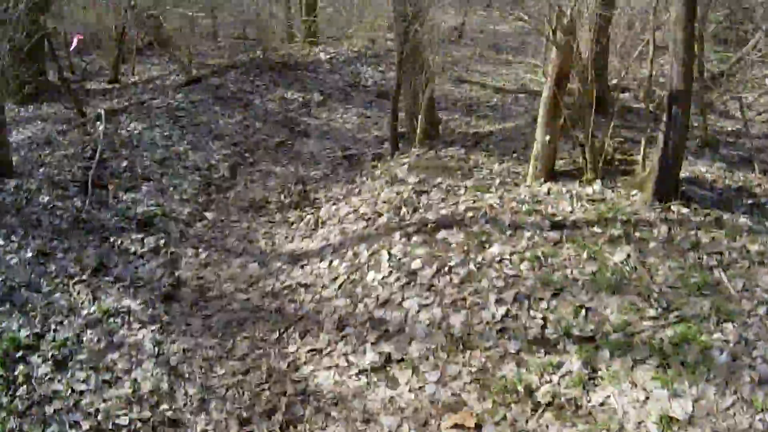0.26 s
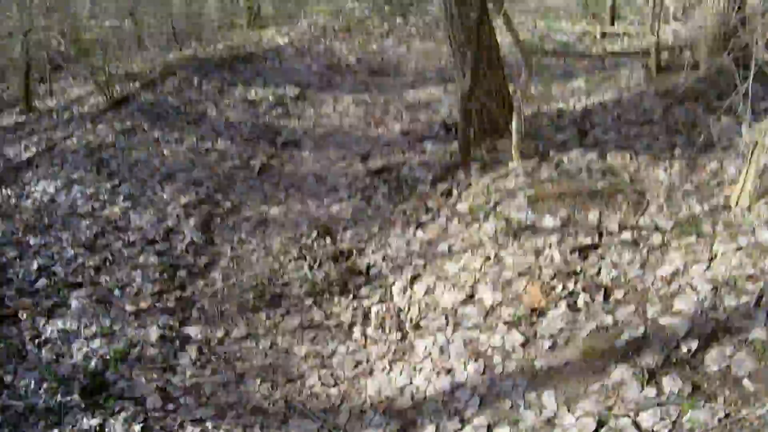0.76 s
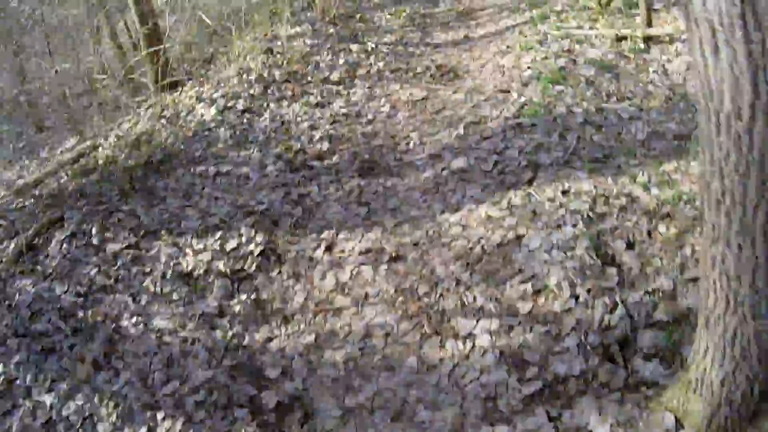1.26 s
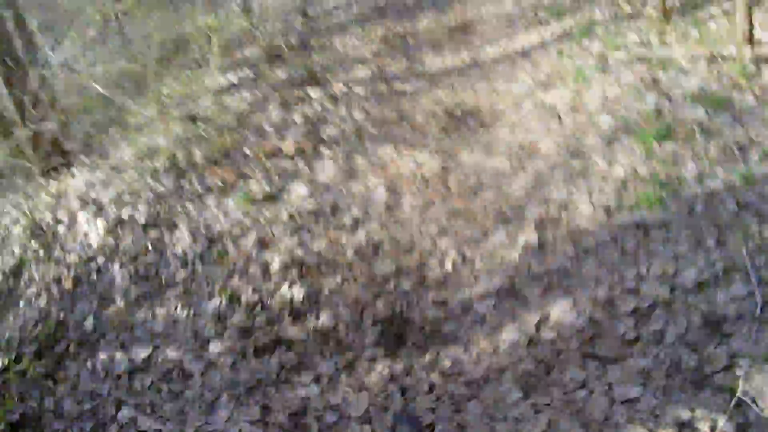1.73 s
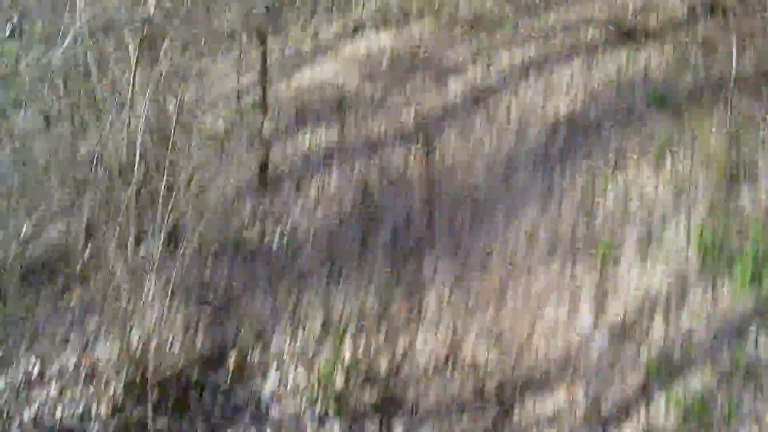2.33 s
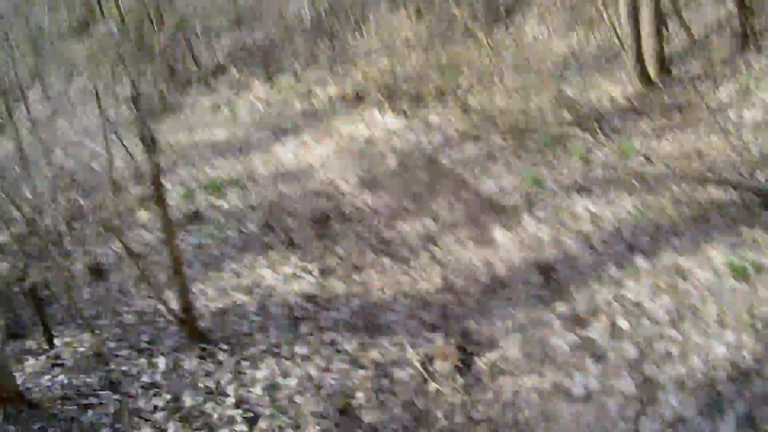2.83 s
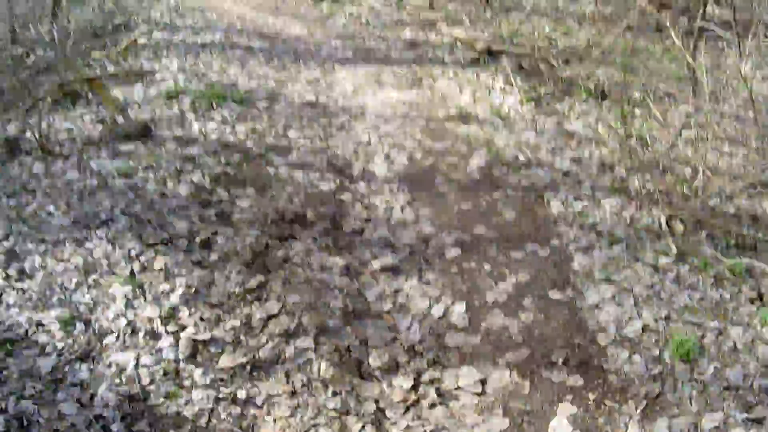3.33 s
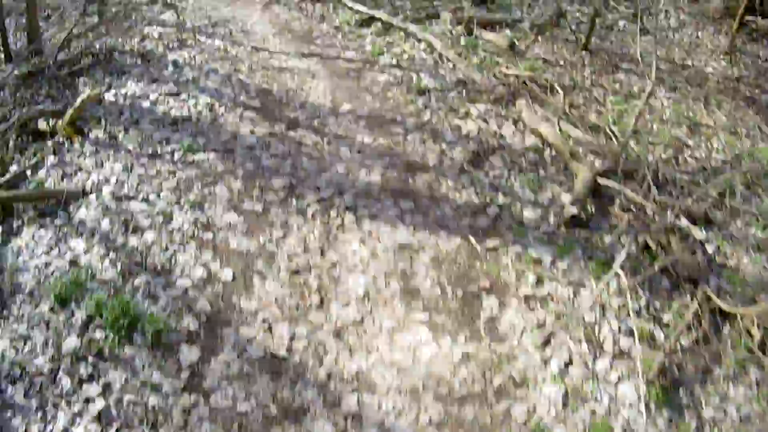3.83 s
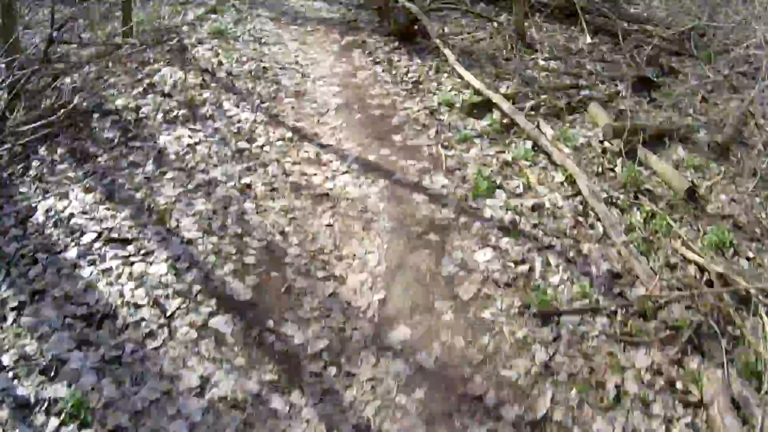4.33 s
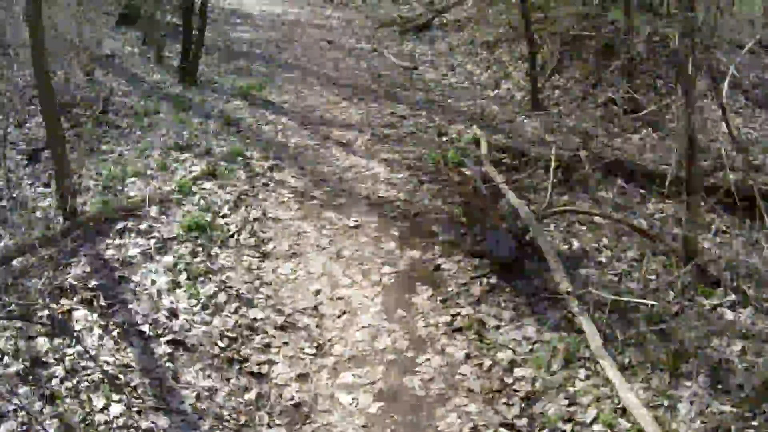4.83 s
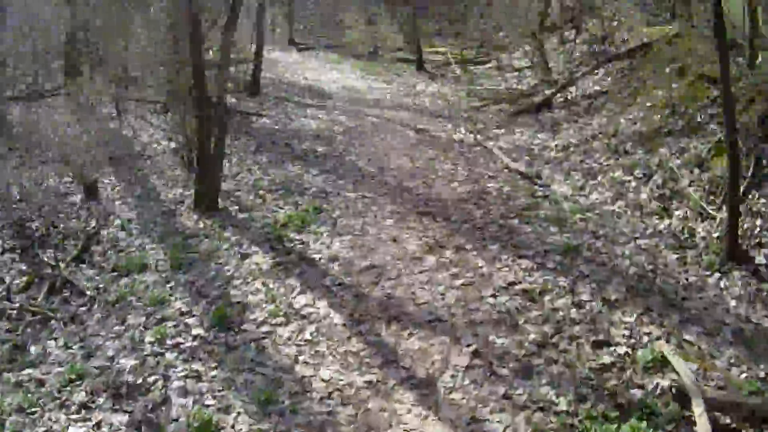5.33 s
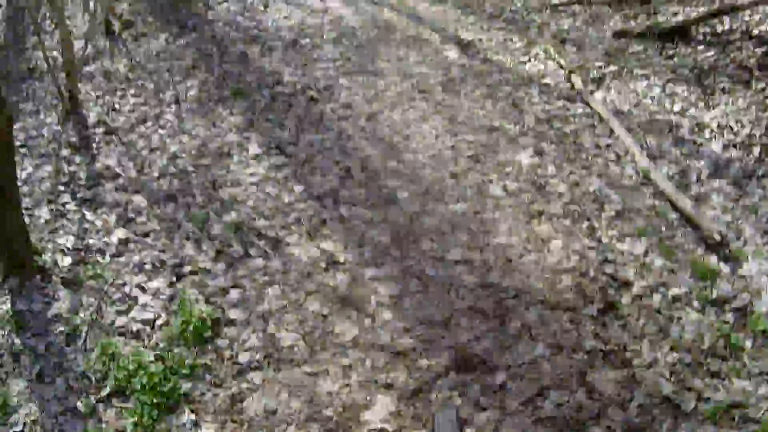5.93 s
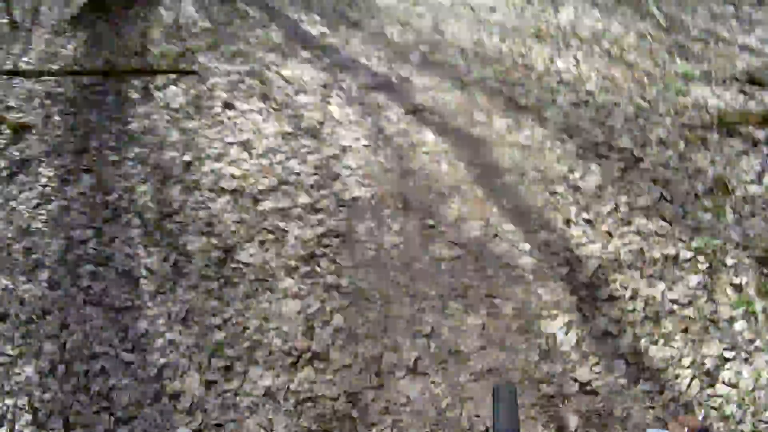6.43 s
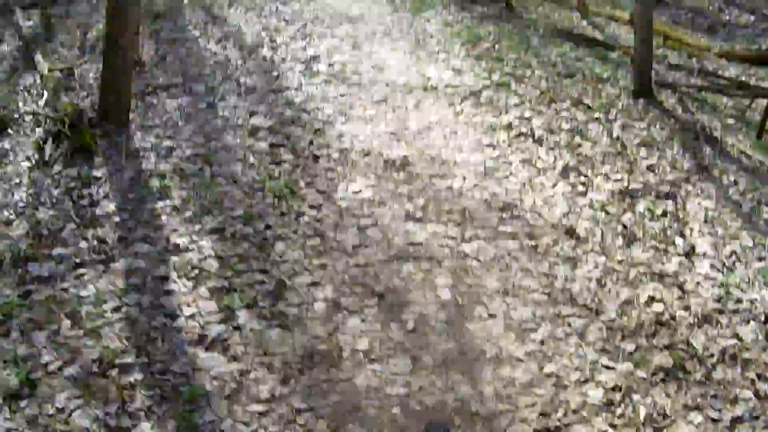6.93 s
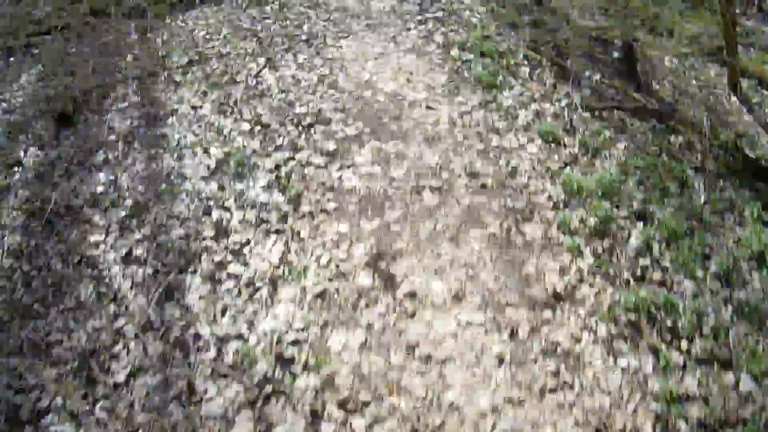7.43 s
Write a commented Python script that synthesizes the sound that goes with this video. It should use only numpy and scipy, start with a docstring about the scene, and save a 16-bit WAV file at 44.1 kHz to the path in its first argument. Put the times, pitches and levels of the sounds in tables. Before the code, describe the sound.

Close, mono, wind-battered sound of a bike on soil and dry leaves outdoors. Knobby tyres roar in uneven pulses, leaves crackle, and roots give short dull thuds. Chain and frame knock in dry metallic clusters, early, near the middle and hardest late, with tiny steel jingles. Brief high brake squeaks come at the start and after the first big jolt. Faint hiss lies beneath.

```python
"""A mountain bike runs down a leafy trail, heard from a small camera on the rider.
Chain and frame knock and chatter: short noise scrapes ring a bank of modes. Tyres roar, thud and crunch
over dry leaves: shaped noise and tiny snaps. A brake disc squeaks thin and high, small steel parts jingle:
narrow noise bands. Air rumbles and buffets the microphone at each bob of the ride, overloading it: noise
shaped by eddy size. A faint, steady hiss lies under everything."""
import sys
import numpy as np
from scipy import signal
from scipy.fft import rfft, irfft, next_fast_len
from scipy.io import wavfile
from scipy.ndimage import uniform_filter1d

SR = 44100
rng = np.random.default_rng(int(sys.argv[2]) if len(sys.argv) > 2 else 0)


def file_out(sig):
    """Save sig as 16-bit WAV at sys.argv[1]."""
    # one column per channel
    cols = np.atleast_2d(sig).T
    # limit, then scale
    lim = np.clip(cols, -1, 1)
    pcm = np.round(lim * 32767).astype(np.int16)
    wavfile.write(sys.argv[1], SR, pcm)


N = 338678

# What sounds throughout the ride: [t/s, headwind rumble level/dB, air streaming past the microphone level/dB,
# tyre roar level/dB, leaf crunch level/dB, chain chatter level/dB]
RIDE = [(0.0, -33, -41, -38, -54.5, -44), (0.53, -33, -43, -38, -59.5, -47),
        (0.81, -30, -44, -39.5, -59, -67), (1.32, -29, -32.5, -34.5, -54.5, -68),
        (1.75, -33, -40, -36, -55, -53), (3.19, -29, -39.5, -31, -51.5, -49),
        (3.36, -35, -39, -38.5, -58.5, -52), (3.7, -34, -38, -37, -79, -67),
        (4.34, -29, -36, -36.5, -69, -61), (4.58, -31.5, -40, -33.5, -57.5, -60),
        (4.96, -31.5, -44, -35, -65, -55), (5.35, -25.5, -37, -33.5, -61.5, -59),
        (5.73, -30.5, -55, -31.5, -55, -51), (5.99, -25.5, -21, -33.5, -52.5, -41),
        (6.25, -24, -48, -30, -51, -66), (6.54, -30, -36.5, -32.5, -52, -49),
        (6.95, -23, -31, -29, -55.5, -47), (7.68, -27.5, -45, -29, -58.5, -39)]
# Bobs of the ride, each a buffet of air and a press on the tyres: [start of the top t/s, hold t/s, rise t/s,
# fall t/s, buffet level/dB, buffet centre f/Hz, rumble level/dB, tyre roar level/dB]; rise and fall: buffet only
BOBS = [(0.004, 0.021, 0.028, 0.049, -31, 287, -30, -45), (0.116, 0.016, 0.044, 0.041, -16, 273, -30, -33),
        (0.18, 0.056, 0.056, 0.098, -27, 288, -35, -48), (0.393, 0.031, 0.039, 0.063, -18, 257, -35, -37.5),
        (0.545, 0.087, 0.095, 0.076, -34, 284, -42, -48), (0.84, 0.013, 0.059, 0.11, -27.5, 270, -46, -42),
        (1.098, 0.026, 0.13, 0.11, -32.5, 285, -41, -55), (1.273, 0.025, 0.023, 0.078, -29, 282, -37, -51),
        (1.507, 0.021, 0.16, 0.096, -22, 282, -35, -47),
        (1.772, 0.049, 0.021, 0.047, -19.5, 296, -37, -33.5),
        (2.021, 0.054, 0.031, 0.031, -19, 315, -32, -33),
        (2.317, 0.042, 0.062, 0.055, -22, 308, -27.5, -41),
        (2.58, 0.017, 0.049, 0.03, -14, 350, -21, -26.5),
        (2.806, 0.035, 0.019, 0.047, -16.5, 413, -35, -47),
        (3.001, 0.062, 0.02, 0.035, -15, 353, -17.5, -29), (3.231, 0.032, 0.017, 0.045, -15, 300, -21, -34),
        (3.448, 0.0088, 0.15, 0.056, -20.5, 284, -42, -64),
        (3.476, 0.016, 0.028, 0.056, -41, 364, -37, -67), (4.332, 0.015, 0.03, 0.098, -31, 302, -29, -62),
        (4.57, 0.022, 0.02, 0.095, -13, 305, -30, -35.5), (4.773, 0.025, 0.054, 0.087, -20, 314, -35, -46),
        (4.949, 0.063, 0.052, 0.046, -18.5, 334, -26, -38),
        (5.074, 0.065, 0.028, 0.052, -39, 325, -32, -44),
        (5.218, 0.052, 0.041, 0.027, -22.5, 340, -35, -38), (5.507, 0.054, 0.084, 0.03, -15, 322, -40, -31),
        (5.791, 0.015, 0.105, 0.021, -13, 343, -19, -39), (5.994, 0.11, 0.014, 0.034, -13.5, 320, -25, -32),
        (6.188, 0.03, 0.026, 0.079, -38, 230, -25, -45), (6.268, 0.014, 0.06, 0.072, -17.5, 380, -20, -22),
        (6.37, 0.017, 0.087, 0.057, -32, 259, -24.5, -42), (6.421, 0.016, 0.067, 0.026, -33, 187, -22, -53),
        (6.491, 0.048, 0.032, 0.034, -15.5, 295, -28, -36), (6.563, 0.03, 0.028, 0.072, -32, 273, -23, -50),
        (6.711, 0.064, 0.048, 0.084, -10.5, 312, -33, -25.5),
        (6.832, 0.032, 0.056, 0.11, -27, 313, -31, -34), (7.022, 0.039, 0.064, 0.046, -9, 383, -31, -30),
        (7.252, 0.056, 0.071, 0.061, -15.5, 324, -28, -30),
        (7.435, 0.052, 0.101, 0.057, -13.5, 395, -19, -29.5),
        (7.631, 0.049, 0.044, 0.026, -15, 370, -29, -34)]
# Rough patches that shake the bike: [start of the top t/s, hold t/s, chain chatter level/dB,
# leaf crunch level/dB, jingle of small steel parts level/dB]
BUMPS = [(.255, 0.014, -47, -80, -76), (.375, 0.012, -54, -60, -76), (.592, 0.022, -25, -59, -55),
         (.64, 0.088, -39, -76, -72), (.81, 0.022, -52, -61, -79), (1.07, .03, -55, -56, -79),
         (1.755, .03, -43, -51, -68), (1.988, 0.027, -48, -54, -65), (2.13, .02, -45, -60, -75),
         (2.3, 0.12, -29, -57, -61), (2.5, 0.022, -38, -52, -68), (2.536, 0.024, -20, -35, -52),
         (2.61, 0.062, -40, -50, -57), (2.78, 0.022, -30, -48, -65), (2.995, 0.021, -25, -36, -49),
         (3.04, 0.11, -34, -54, -57), (3.2, 0.017, -31, -45.5, -61), (3.255, .02, -33, -62, -71),
         (3.915, 0.062, -55, -56.5, -75), (4.04, 0.024, -47, -57, -79), (4.35, 0.022, -54, -58, -79),
         (4.43, 0.045, -46, -51.5, -72), (4.53, .04, -53, -52.5, -73), (5.17, 0.024, -55, -64, -79),
         (5.42, 0.095, -39, -69, -72), (5.72, 0.033, -43, -54, -65), (6.048, 0.022, -18, -49, -50),
         (6.19, 0.015, -26, -48, -60), (6.24, 0.026, -10.5, -34, -42), (6.29, .02, -39, -43, -62),
         (6.325, 0.026, -17, -41, -44), (6.385, 0.022, -34, -63, -52), (6.452, 0.016, -44, -51, -77),
         (6.535, 0.017, -31, -60, -70), (6.71, 0.049, -48, -49, -71), (7.02, 0.033, -28, -49, -66),
         (7.27, 0.072, -47, -58, -72), (7.43, 0.029, -43, -51, -73), (7.65, .02, -42, -59, -68)]
BUMP_RISE_S, BUMP_FALL_S = 0.018, 0.036  # time per 20 dB


def gain_of(db):
    """Amplitude factor of a level in dB."""
    return 10 ** (np.asarray(db) / 20)


def evened(x):
    """Scales a signal to an RMS of 1."""
    return x / np.sqrt(np.mean(x ** 2) + 1e-20)


def read(points, hz):
    """Reads a table of (f/Hz, value) at any frequency, along a log frequency axis."""
    f, value = np.transpose(points)
    return np.interp(np.log(hz + 1), np.log(f + 1), value)


def curve(rows, column):
    """One column of a table, sample by sample."""
    rows = np.array(rows)
    return np.interp(np.arange(N) / SR, rows[:, 0], rows[:, column])


def add(mix, s, sound):
    """Lays a sound into the mix from second s, cut where the mix ends."""
    part = mix[round(s * SR):][:len(sound)]
    part += sound[:len(part)]


def swells(rows, column, rise_s, fall_s):
    """Each row climbs 20 dB per rise_s, holds its level and drops 20 dB per fall_s; the gains add up."""
    out = np.zeros(N)
    t = np.arange(-.3, .5, 1 / SR)
    rises, falls = rise_s * np.ones(len(rows)), fall_s * np.ones(len(rows))
    for row, rise, fall in zip(rows, rises, falls):
        before = np.maximum(-t, 0) / max(rise, .005)
        after = np.maximum(t - row[1], 0) / max(fall, .005)
        swell = gain_of(row[column] - 20 * (before + after))
        start_s = row[0] + t[0]
        early = max(-round(start_s * SR), 0)  # samples that fall ahead of the start
        add(out, max(start_s, 0), swell[early:])
    return out


def resonate(x, hz, width):
    """Shifts the curve hz down to zero, smooths, and shifts back: a resonance of gain 1."""
    turn = np.exp(2j * np.pi * np.cumsum(hz * np.ones(len(x))) / SR)
    r = np.exp(-np.pi * width / SR)
    return 2 * (turn * signal.lfilter([1 - r], [1, -r], x / turn + 1e-18)).real


def filtered(x, points):
    """Passes a whole signal through the spectrum of a table."""
    size = next_fast_len(N)
    gain = gain_of(read(points, np.fft.rfftfreq(size, 1 / SR)))
    return irfft(rfft(x, size) * gain, size)[:N]


def coloured(x, points):
    """Shapes a signal by the spectrum of a table, then evens its level."""
    return evened(filtered(x, points))


def flicker(per_s, depth_db):
    """A gain that wanders at random, about per_s times a second."""
    knots = rng.standard_normal(int(N / SR * 400))  # 400 a second
    knots = evened(uniform_filter1d(knots, max(round(400 / per_s), 1)))
    wander = np.interp(np.arange(N), np.linspace(0, N, len(knots)), knots)
    return evened(gain_of(depth_db * wander))


def snaps(per_s, spread_db):
    """Sparse clicks of random sign; a few are large."""
    draw, size, sign = rng.random(N), rng.exponential(1, N), rng.standard_normal(N)
    happens = draw < per_s / SR
    return evened(happens * gain_of(spread_db * np.minimum(size, 4)) * sign)


def hiss_floor():
    """A faint, steady hiss under everything: steady noise with a table's colour."""
    # Spectrum of the hiss: [f/Hz, relative level/dB per Hz]
    hiss = [(2500, -29), (4000, -7), (5500, 0), (7700, -8), (15600, -9)]
    return gain_of(-67) * coloured(rng.standard_normal(N), hiss)


def headwind_rumble():
    """Slow air pressing on the microphone: lumpy low noise that swells with each bob."""
    # Spectrum of the low wind: [f/Hz, relative level/dB per Hz]
    low_wind = [(7.1, 2), (12, 0.5), (49, -7.5), (80, -1.5), (112, -5.5), (125, -5.5), (300, -22),
                (390, -60), (660, -120)]
    lumps = flicker(25, depth_db=2.6) * flicker(6.4, depth_db=2.0)
    rumble = coloured(rng.standard_normal(N), low_wind) * lumps
    push = gain_of(curve(RIDE, column=1)) + swells(BOBS, column=6, rise_s=0.033, fall_s=0.031)
    return push * rumble


def buffeting():
    """Eddies of air striking the microphone: their size sets the moving centre of a noise spectrum."""
    # Spectrum of a buffet: [f/Hz when centred on 300 Hz, relative level/dB]
    gust = [(40, 2), (120, 1.5), (300, 5), (500, -1), (900, -15.5), (1600, -23.5), (3500, -54.5),
            (9000, -103)]
    hz, t, z = signal.stft(rng.standard_normal(N), SR, nperseg=1024, noverlap=768)
    bobs = np.array(BOBS).T
    centre_hz = np.interp(t, bobs[0], bobs[5])
    shape = gain_of(read(gust, hz[:, None] * 300 / centre_hz))  # slides with the centre
    shape /= np.sqrt(np.mean(shape ** 2, axis=0))  # equal power in every frame
    eddies = evened(signal.istft(z * shape, SR, nperseg=1024, noverlap=768)[1][:N])
    eddies = eddies * flicker(60, depth_db=2.5)
    force = gain_of(curve(RIDE, column=2)) + swells(BOBS, column=4, rise_s=bobs[2], fall_s=bobs[3])
    return force * eddies


def whistle(hz, level, width_hz):
    """Steel singing in a narrow, fluttering band: noise through two equal resonances."""
    once = resonate(rng.standard_normal(N), hz, width_hz)
    return level * evened(resonate(once, hz, width_hz))


def jingle():
    """Small steel parts shaken by the rough patches: a high noise band."""
    level = swells(BUMPS, column=4, rise_s=BUMP_RISE_S, fall_s=BUMP_FALL_S)
    return whistle(13800, level, width_hz=1000)


def brake_squeak():
    """The brake disc sings in short, thin squeaks: a narrow band that follows each squeak's pitch."""
    # Squeaks of the brake disc: [start of the top t/s, hold t/s, level/dB, centre f/Hz]
    squeaks = [(.035, .022, -53, 11600), (.178, 0.0088, -47, 11570), (.265, .026, -55, 11600),
               (.455, .04, -69, 11650), (3.285, 0.034, -44, 12100), (3.35, 0.037, -56, 11650)]
    level = swells(squeaks, column=2, rise_s=0.033, fall_s=0.035)
    return whistle(curve(squeaks, column=3), level, width_hz=320)


def leaf_crunch():
    """Dry leaves break under the tyres: clumps of tiny snaps over a rustle."""
    # Spectrum of the leaves: [f/Hz, relative level/dB per Hz]
    leaf_colour = [(1500, -37), (2500, 4), (3300, -1.5), (4500, -2.5), (6000, -5.5), (7600, -9.5),
                   (10000, -10.5), (12500, -16.5), (14500, -22), (16000, -25)]
    clumps = flicker(60, depth_db=3.5)
    breaking = 0.6 * rng.standard_normal(N) + 0.53 * snaps(2200, spread_db=1.5)
    leaves = coloured(breaking, leaf_colour) * clumps
    crunch = gain_of(curve(RIDE, column=4)) * flicker(25, depth_db=1.5)
    crunch += swells(BUMPS, column=3, rise_s=BUMP_RISE_S, fall_s=BUMP_FALL_S)
    return crunch * leaves


def tyre_roar():
    """Knobs roar on the soil: noise with some snaps, louder as each bob presses on the tyres."""
    # Spectrum of the roar: [f/Hz, relative level/dB per Hz]
    roar_colour = [(180, -42), (300, -3.5), (502, -0.5), (619, -1), (725, -1.5), (861, -2), (1090, -4.5),
                   (1480, -16), (2220, -14.5), (2710, -27), (4080, -31.5), (4470, -44), (6140, -45),
                   (7000, -46), (9100, -68), (15400, -120)]
    soil = rng.standard_normal(N) + .22 * snaps(700, spread_db=3.0)
    roar = coloured(soil, roar_colour) * flicker(80, depth_db=1.3)
    load = swells(BOBS, column=7, rise_s=0.033, fall_s=0.02)
    return (gain_of(curve(RIDE, column=3)) + load) * roar


def thuds():
    """Tyres thud on roots and stones: short, decaying bursts of resonant noise."""
    # Thuds: [t/s, level before attack and decay/dB, centre f/Hz]
    hits = [(0.102, -17.5, 918), (0.492, -34, 692), (1.006, -21, 673), (1.306, -28, 576), (2.041, -13, 666),
            (2.65, -22, 1120), (2.8, -18, 501), (3.01, -4.5, 746), (3.106, -41, 587), (3.22, -11.5, 517),
            (3.507, -15, 604), (4.334, -33, 519), (4.978, -31, 608), (5.206, -17, 530), (5.487, -20, 646),
            (5.565, -9.5, 664), (5.692, -30, 785), (5.741, -9, 729), (5.869, -22, 815), (5.986, -19, 635),
            (6.11, -9.5, 566), (6.245, -13.5, 1640), (6.996, -7.5, 587), (7.114, -29, 517),
            (7.248, -10.5, 519)]
    t60_s, attack_s, width_hz = 0.033, 0.0027, 400
    out = np.zeros(N)
    t = np.arange(4000) / SR
    for s, db, hz in hits:
        once = resonate(rng.standard_normal(len(t)), hz, width_hz)
        band = evened(resonate(once, hz, width_hz))
        add(out, s, band * gain_of(db - 60 * t / t60_s) * np.minimum(t / attack_s, 1))
    return out


def knocks(mode_hz):
    """Each knock is a short noise scrape that drives most the modes near its favoured pitch."""
    # Knocks of chain and frame: [t/s, scrape level/dB, favoured mode f/Hz, treble level/dB,
    # body level/dB, decay t60/s]; treble and body are relative to the scrape
    strikes = [(0.0283, -33, 6510, -3, -6, 0.044), (0.1837, -23.5, 5000, -27, -10, 0.029),
               (0.214, -32, 3290, -20, -1, 0.035), (0.247, -29, 5220, -22, -4, 0.035),
               (0.2638, -26, 3760, -28, -11, 0.032), (0.3351, -53, 5140, -20, -6, 0.035),
               (0.4828, -33, 6580, -17, -2, 0.04), (0.4923, -33, 3200, -20, -1, 0.11),
               (0.5174, -31, 3240, -16, -9, 0.04), (0.57, -28, 3720, -18, -11, 0.035),
               (0.5955, -14, 3920, -18, -11, 0.052), (0.6393, -22, 3770, -31, -2, 0.067),
               (0.6674, -33, 3340, -33, 3, 0.055), (0.7075, -29, 3750, -26, -6, 0.04),
               (0.8949, -37, 3480, -18, -2, 0.039), (0.9557, -41, 3460, -19, 9, 0.045),
               (1.385, -28.5, 3330, -7, -16, 0.04), (1.7619, -33, 4080, -14, -3, 0.035),
               (1.8465, -34, 3860, -21, -5, 0.035), (1.8806, -34, 4090, -12, 2, 0.042),
               (1.9934, -27, 3970, -7, -2, 0.043), (2.2737, -28.5, 3690, -22, 1, 0.041),
               (2.3012, -34, 4560, -26, 2, 0.041), (2.3211, -18, 3750, -31, -7, 0.039),
               (2.3496, -21.5, 3760, -27, -10, 0.051), (2.378, -18.5, 4400, -18, 0, 0.024),
               (2.4034, -23, 4420, -19, 5.5, 0.026), (2.5005, -21.5, 4140, -26, -1, 0.046),
               (2.5104, -25, 4130, -23, -4, 0.035), (2.5334, -16.5, 6570, -15, -2.5, 0.035),
               (2.5441, -10, 4730, -13, -8.5, 0.042), (2.5554, -16, 4900, -23, -7, 0.035),
               (2.5704, -20, 4160, -20, 1, 0.035), (2.6177, -19, 3290, -21, -8, 0.027),
               (2.6304, -25, 5210, -11, -1, 0.027), (2.652, -13, 4200, -10, -7, 0.025),
               (2.7686, -27, 3440, -16, -5, 0.043), (2.781, -26, 4120, -15, -5, 0.04),
               (2.8804, -28.5, 3200, -14, -6, 0.04), (2.9662, -30, 4660, -18, 2, 0.044),
               (2.9766, -25, 4120, -17, -3, 0.04), (3.0026, -7, 4770, -24, -18, 0.033),
               (3.0104, -5, 4170, -21, -15, 0.03), (3.0334, -23.5, 4160, -22, 0, 0.035),
               (3.0504, -40, 5250, -20, -1, 0.029), (3.1052, -16.5, 4150, -9, -5, 0.026),
               (3.1532, -34, 3390, -18, -4, 0.035), (3.2021, -30, 4800, -15, 0, 0.035),
               (3.2131, -22, 4130, 2, -3, 0.032), (3.2254, -27, 4030, -22, 6, 0.035),
               (3.2615, -21, 5300, -6, -2, 0.032), (3.3154, -29, 4170, -17, -7, 0.048),
               (3.359, -35, 4810, -8, 1, 0.047), (3.5798, -36, 3200, -12, -5, 0.032),
               (3.916, -42, 3360, -4, 1, 0.035), (4.0452, -41, 3430, -19, 7, 0.035),
               (4.4199, -40, 4210, -19, 8, 0.035), (4.4383, -37, 3430, -17, 0, 0.035),
               (4.5406, -34, 4010, -16, -10, 0.035), (4.56, -26, 4200, -27, -13, 0.033),
               (4.6613, -41, 4010, -25, -8, 0.035), (5.0315, -32.5, 4160, -33, 1, 0.046),
               (5.3378, -33.5, 3260, -13, -1, 0.044), (5.4156, -32, 3390, -27, -6, 0.035),
               (5.444, -28.5, 3920, -26, -1, 0.035), (5.5129, -32, 3210, -13, -4, 0.035),
               (5.6131, -31, 3780, -29, -2, 0.062), (5.7284, -33, 4150, -18, -5, 0.035),
               (5.7513, -33, 3240, -19, -7, 0.035), (5.7957, -27, 3220, -24, -4, 0.035),
               (5.9374, -33, 3820, -16, 5, 0.052), (5.965, -21.5, 4010, -25, -10, 0.024),
               (5.9943, -43, 3660, -25, -5, 0.035), (6.0227, -30, 3840, -23, -4, 0.035),
               (6.043, -22, 4630, -21, -11, 0.049), (6.0606, -13.5, 5210, -22, -13, 0.062),
               (6.0736, -15, 4240, -23, -13, 0.043), (6.1389, -29.5, 4170, -17, 1, 0.06),
               (6.162, -24, 3910, -17, -10, 0.053), (6.1824, -21, 5310, -13, -9, 0.035),
               (6.1908, -12.5, 3750, -23, -5.5, 0.035), (6.2196, -15, 6550, -23, -10, 0.059),
               (6.2314, -15, 6600, -23, -29, 0.031), (6.244, -0.5, 6560, -24, -19, 0.031),
               (6.2537, 1.5, 6540, -20, -18, 0.048), (6.2684, -28.5, 3850, -14, 12, 0.047),
               (6.2966, -11.5, 4140, -32, -10, 0.033), (6.3104, -10, 5830, -30, -13, 0.039),
               (6.3264, -23, 5050, -22, 8, 0.061), (6.3345, -10, 5080, -23, -9, 0.061),
               (6.3484, -22, 5350, -16, -4, 0.035), (6.3889, -17, 3800, -27, 1, 0.026),
               (6.3964, -22, 3740, -19, -3, 0.043), (6.418, -22, 3320, -12, -22, 0.03),
               (6.4562, -22, 3990, -3, 2, 0.032), (6.537, -20, 4160, -28, -2.5, 0.035),
               (6.576, -24, 4080, -26, 6, 0.033), (6.6428, -21, 5450, -15, -9, 0.043),
               (6.7201, -33, 3420, -25, -1, 0.032), (6.8003, -23, 3350, -20, -8, 0.039),
               (6.8713, -23, 3360, -25, -1, 0.027), (6.8957, -29, 5240, -21, 0, 0.04),
               (7.016, -29, 3470, -26, 3, 0.035), (7.2143, -26, 3420, -30, -7, 0.035),
               (7.289, -26, 3200, -25, 2, 0.035), (7.3058, -25.5, 3470, -17, 1, 0.035),
               (7.3553, -24, 4980, -28, -17, 0.041), (7.4415, -26.5, 4020, -20, 8, 0.041),
               (7.634, -46, 3320, -24, 3, 0.035)]
    t = np.arange(4000) / SR
    drive = np.zeros((len(mode_hz), N))
    cracks, tops, bodies = np.zeros((3, N))
    for s, db, favoured_hz, treble_db, body_db, t60 in strikes:
        decay = gain_of(db - 60 * t / max(t60, .004))
        scrape = rng.standard_normal(len(t)) * decay * np.minimum(t / .0012, 1)
        near_db = 7 - np.minimum(90 * abs(np.log2(mode_hz / favoured_hz)), 15)
        modes_db = np.where(mode_hz < 2800, body_db - 7, near_db)  # low modes follow the body
        modes_db = modes_db + 3 * rng.standard_normal(len(mode_hz))
        for row, mode_db in zip(drive, modes_db):
            add(row, s, gain_of(mode_db) * scrape)
        # brightest around the part that is hit
        add(cracks, s, scrape + 1.2 * resonate(scrape, favoured_hz, 1200))
        add(tops, s, gain_of(treble_db) * scrape)
        add(bodies, s, gain_of(body_db) * scrape)
    return drive, cracks, tops, bodies


def chatter():
    """Dense light touches between parts, each scraping for a few ms; returns their level and grains."""
    touches = abs(snaps(600, spread_db=3))
    decay_s = 0.0016
    grains = signal.lfilter([1], [1, -np.exp(-1 / (decay_s * SR))], touches)
    grains = evened(grains * rng.standard_normal(N))
    shaking = gain_of(curve(RIDE, column=5)) * flicker(45, depth_db=5.0)
    shaking += swells(BUMPS, column=2, rise_s=BUMP_RISE_S, fall_s=BUMP_FALL_S)
    return shaking, grains


def rattle():
    """Knocks and chatter ring the damped modes of chain and frame, beside the sound of the contact itself."""
    # Modes of chain and frame: [f/Hz, width before damping/Hz, relative level/dB]
    modes = [(1640, 98, 0), (2150, 35, -2), (2500, 30, -6), (2920, 110, -2), (3330, 46, -9),
             (3760, 120, -7), (4170, 120, -8), (4640, 80, -8), (5050, 140, -7), (5850, 110, -6),
             (6570, 38, 0), (7040, 140, -13)]
    # The contact itself: [f/Hz, level/dB]
    crack_colour = [(1500, -21), (2800, -18), (4500, -9.5), (6800, -12.5), (7800, -32)]
    # Its brittle top: [f/Hz, level/dB]
    top_colour = [(5500, -46), (7500, -9), (10000, -11), (13000, -20), (15700, -13)]
    # The dull weight behind a knock: [f/Hz, level/dB]
    body_colour = [(900, -26), (1400, 4), (2200, 8), (3000, -18), (4000, -47)]
    # The rings carry little treble: [f/Hz, level/dB]
    ring_colour = [(1000, -30), (1600, 1), (2500, 0), (3500, -7), (5000, -10.5), (7000, -25), (8200, -13),
                   (15000, -56)]
    mode_hz = np.array(modes)[:, 0]
    drive, cracks, tops, bodies = knocks(mode_hz)
    shaking, grains = chatter()
    for row, low in zip(drive, mode_hz < 2800):  # own moments for every part, the heavy ones less
        add(row, 0, gain_of(-8 * low) * shaking * np.roll(grains, rng.integers(N)))
    damping = 2  # links in contact widen each mode by this factor
    rings = np.zeros(N)
    for row, (hz, width, db) in zip(drive, modes):
        ring = resonate(row, hz, damping * width)
        rings += gain_of(db) * ring * np.sqrt(SR / width) / 12  # lifts the narrow modes
    contact = filtered(cracks + shaking * grains, crack_colour)
    contact += filtered(tops, top_colour) + filtered(bodies, body_colour)
    return filtered(rings, ring_colour) + contact


def scene():
    """Hiss and wind behind the bike's steel, tyres and rattle, in one channel."""
    background = hiss_floor() + headwind_rumble() + buffeting()
    steel = jingle() + brake_squeak()
    tyres = leaf_crunch() + tyre_roar() + thuds()
    return (background + steel + tyres + rattle())[None]


def record(dry):
    """The microphone stage flattens strong peaks at a hard knee; then a low-pass limits the band."""
    overload, edge_hz = 0.4, 15770  # overload: amplitude at the knee
    flattened = dry / (1 + abs(dry / overload) ** 9.4) ** (1 / 7.9)
    low_pass = signal.firwin(1023, edge_hz, window=("kaiser", 9), fs=SR)
    return signal.oaconvolve(flattened, low_pass[None], "same")


dry = scene()
out = record(dry)
file_out(out)
```